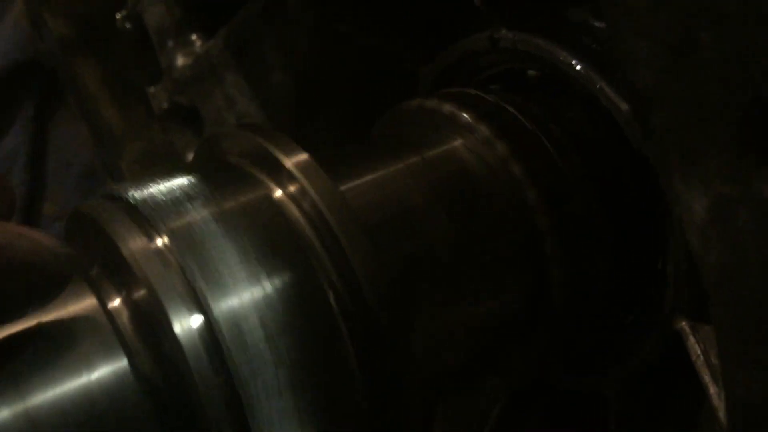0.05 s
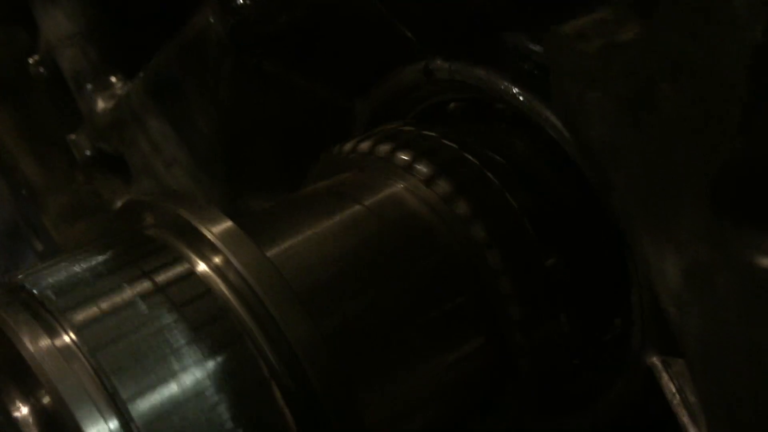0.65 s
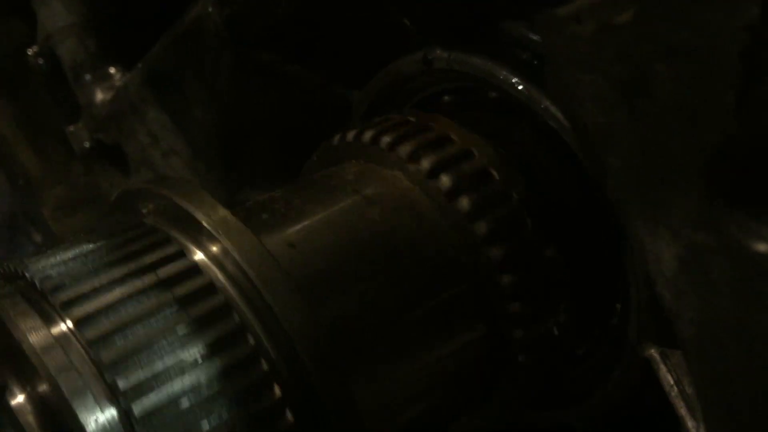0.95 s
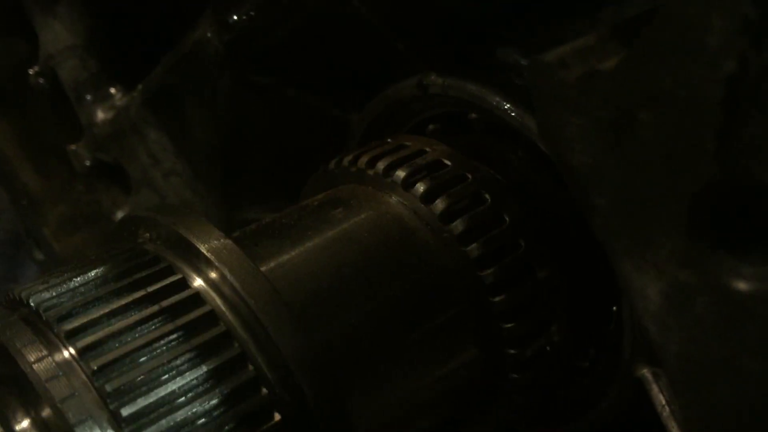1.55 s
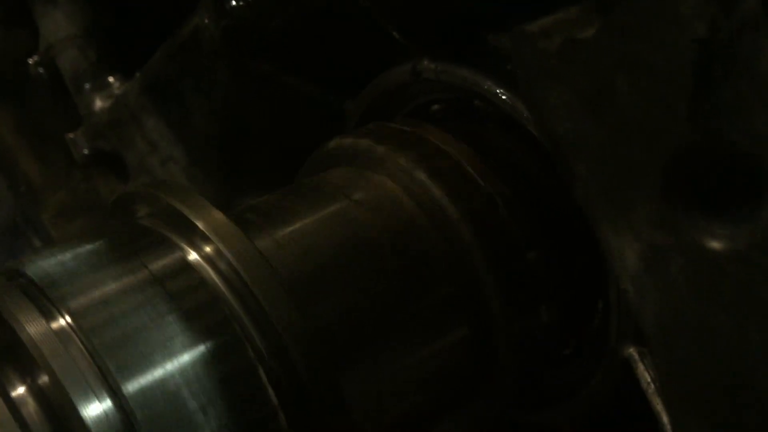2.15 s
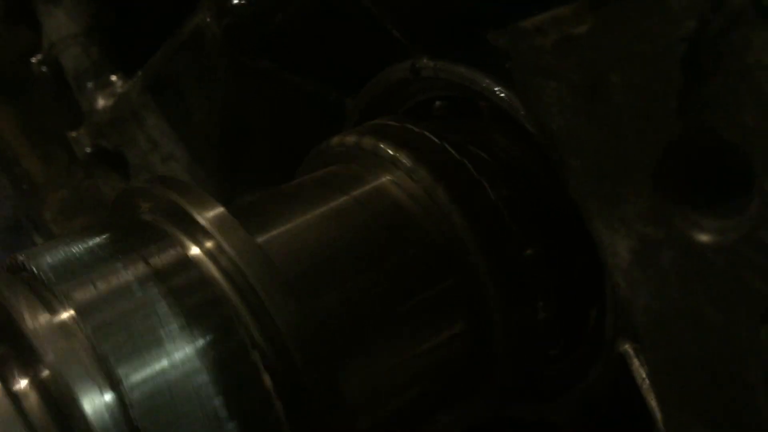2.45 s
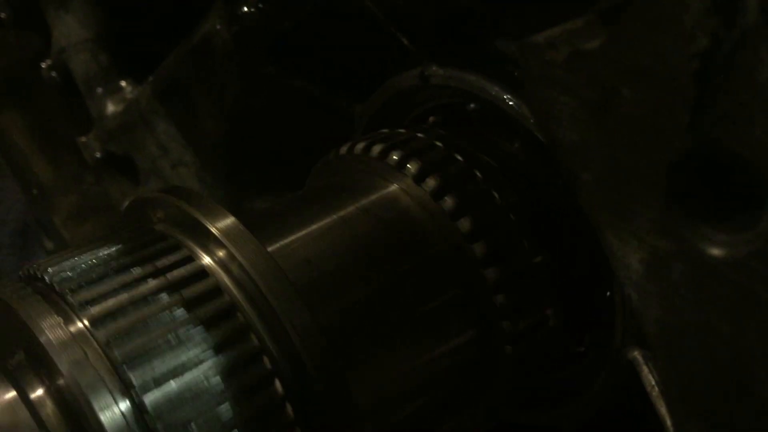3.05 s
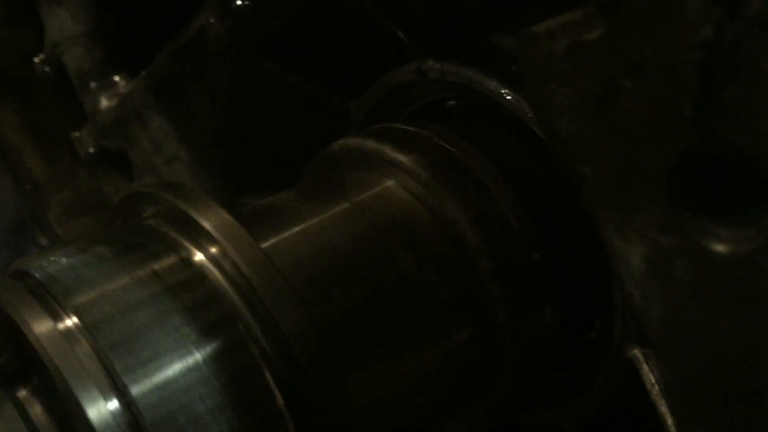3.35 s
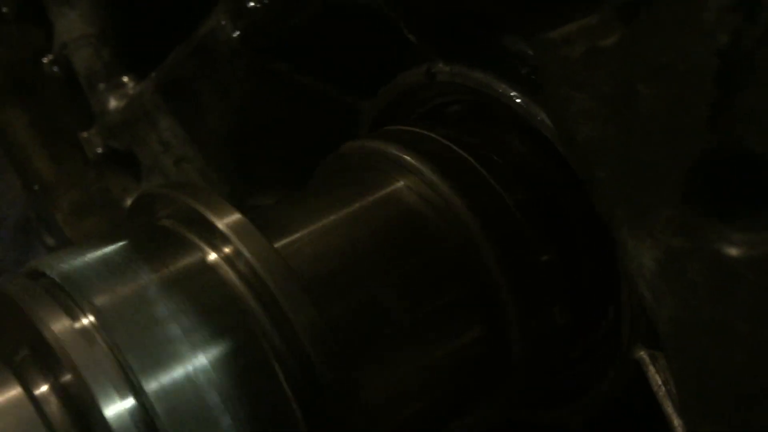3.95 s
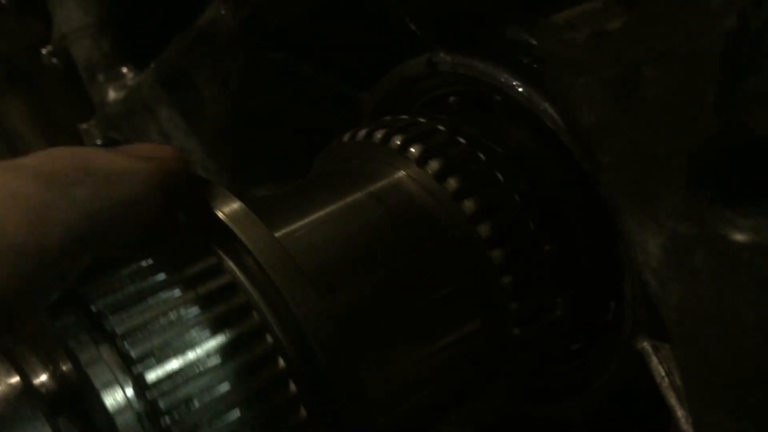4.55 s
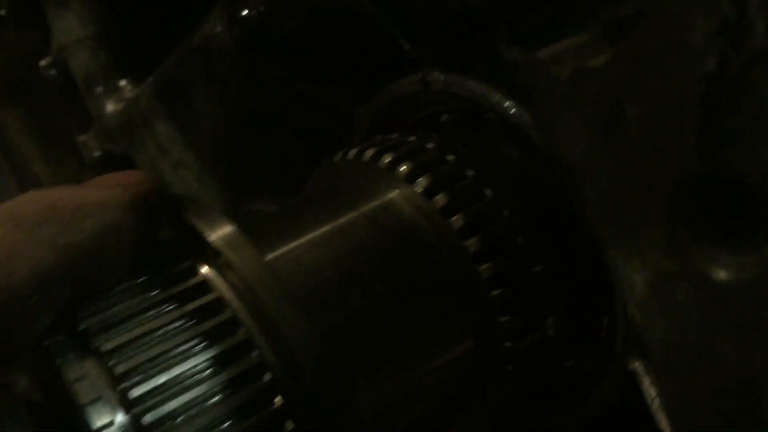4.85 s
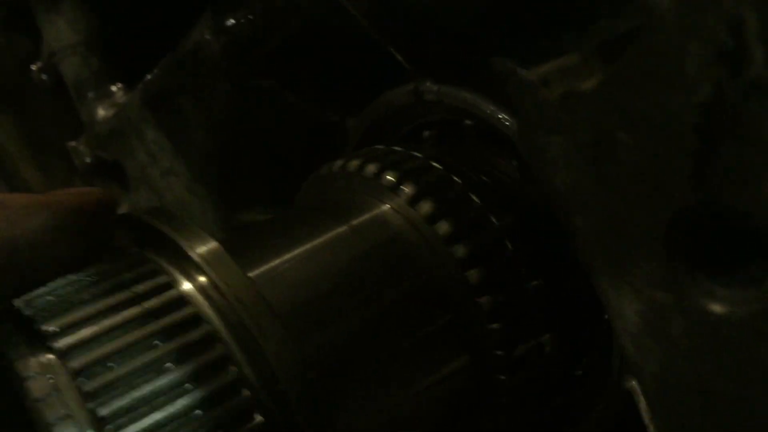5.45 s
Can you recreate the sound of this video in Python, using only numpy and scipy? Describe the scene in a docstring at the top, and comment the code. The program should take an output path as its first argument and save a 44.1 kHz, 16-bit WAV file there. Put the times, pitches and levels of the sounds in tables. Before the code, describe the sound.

A worn bearing rumbles, scrapes and crackles in fits and starts as a hand turns its loose, knocking metal shaft.

```python
"""A steel shaft coasts in a worn roller bearing, over soft workshop noise and a faint electrical whine.
Rollers bump over pits and ring the housing, grit scrapes and cracks on the races, and the loose shaft
rumbles and knocks. After a second it stops and loose rollers clink against their cage. A hand pushes it
round in short spells, throws it into a spin near 3.8 s, brakes it with a hiss of the palm, then rocks it.
Each impact excites the damped resonances of the part it strikes."""
import sys
import numpy as np
from scipy import signal
from scipy.fft import rfft, irfft
from scipy.io import wavfile

SR = 44100
rng = np.random.default_rng(int(sys.argv[2]) if len(sys.argv) > 2 else 0)


def to_wav(sig):
    """Store sig (one row per channel, or 1-D mono) as 16-bit WAV at the path in sys.argv[1].

    Samples outside -1..1 are clipped; the rate is SR.
    """
    pcm = np.clip(np.atleast_2d(sig), -1, 1) * 32767
    pcm = np.round(pcm).astype(np.int16)
    wavfile.write(sys.argv[1], SR, pcm.T)  # frames by channels


N = 251370

# resonances of the bearing's parts: (frequency [Hz], bandwidth [Hz], level [dB])
HOLLOW_MODES = [(316.5, 14.3, -7), (390.5, 25, 1), (401, 22, -10), (412, 28, -10.5), (429.2, 36, -1)]  # hollow of the cast housing
WALL_MODES = [(575.7, 27, 5.5), (634, 7.9, 5.5), (661, 27, -1), (692, 35, -2.5), (826, 12, 4),
              (863, 106, -3), (948, 30, -5.5), (1057, 9.7, -13), (1197, 100, -9.5), (1362, 65, -5.5),
              (1609, 36, -11), (1880, 25, -12), (1980, 68, -15.5)]  # walls of the housing
RACE_MODES = [(1275, 264, 4.5), (1568, 50, 9.5), (2002, 137, 3.5), (2375, 107, 0), (2665, 38, 6),
              (2896, 57, 0.5), (3194, 146, 1), (3262, 204, 0.5), (3546, 99, -1.5), (4100, 140, -1),
              (4160, 93, -2.5), (4400, 60, -26), (4900, 71, -8.5)]  # races and roller cage
ROLLER_MODES = [(5390, 980, -1), (6240, 86, -0.5), (6430, 240, -4.5), (6854, 28, 9), (7060, 220, 3),
                (7850, 310, -5), (8500, 106, 6), (8880, 270, -0.5), (9580, 430, -5.5), (10980, 370, -12),
                (11690, 430, -1.5), (11860, 120, -8.5), (12600, 560, -13), (13600, 530, -7),
                (13400, 200, -14), (15500, 480, -10.5)]


def amp(db):
    """Amplitude ratio of a level: a factor of ten per 20 dB."""
    return 10 ** (np.asarray(db) / 20)


def unit_rms(x):
    """Normalisation to a mean power of 1."""
    return x / np.sqrt(np.mean(x ** 2) + 1e-20)


def add(mix, start_s, sound):
    """Superposition: a sound adds to the mix from its starting time."""
    part = mix[max(round(start_s * SR), 0):][:len(sound)]
    part += sound[:len(part)]


def wander(cutoff_hz):
    """Low-passed Gaussian noise: a slow random fluctuation of rms 1."""
    f = np.fft.rfftfreq(N, 1 / SR)
    return unit_rms(irfft(rfft(rng.standard_normal(N)) / (1 + (f / cutoff_hz) ** 4), N))


def ring(modes, skirt=1.36, size=16384):
    """Impulse response of damped resonances, peak 1; skirt steepens the roll-off outside their range."""
    f = np.fft.rfftfreq(size, 1 / SR) + 1
    power = sum(amp(db) ** 2 / (1 + (2 * (f - hz) / width) ** 2) for hz, width, db in modes)
    low_hz, high_hz = modes[0][0], modes[-1][0] * np.sqrt(2)
    power /= ((1 + (low_hz / f) ** 4) * (1 + (f / high_hz) ** 4)) ** skirt
    # folding the cepstrum gives a causal, minimum-phase response
    cepstrum = irfft(np.log(power / power.max() + 1e-10) / 2)
    cepstrum[1:size // 2] *= 2
    cepstrum[size // 2 + 1:] = 0
    response = irfft(np.exp(rfft(cepstrum)))[:size // 2]
    return response / abs(response).max()


def impacts(per_s, spread_db):
    """Shot noise: independent tiny blows of random sign and size, rms 1."""
    size = amp(spread_db * np.minimum(rng.exponential(1, N), 4)) * rng.choice([-1, 1], N)
    struck = rng.random(N) < per_s / SR
    return unit_rms(size * struck / np.sqrt(per_s))


def excite(force, response):
    """Forced vibration: the force is convolved with an impulse response of unit energy."""
    return signal.oaconvolve(force, response / np.linalg.norm(response))[:N]


def casing(direct, wet, t60=0.051, count=40):
    """Early reflections from the surrounding metal follow the direct sound, decaying exponentially."""
    delay_s = rng.uniform(.001, .03, count)
    taps = np.zeros(SR // 20)
    taps[(delay_s * SR).astype(int)] = rng.choice([-1, 1], count) * amp(-60 * delay_s / t60)
    taps *= wet / np.linalg.norm(taps)
    taps[0] = 1
    return excite(direct, taps)


def rolling(force, modes, skirt, uneven_db, detune, wet, count=6):
    """Moving excitation: the contact wanders among places, each with its own modal mix and reflections."""
    hz, width, db = np.transpose(modes)
    shares = amp(13.6 * np.array([wander(22) for _ in range(count)]))
    shares /= np.linalg.norm(shares, axis=0)
    chance = rng.standard_normal((2, count, len(hz)))
    shifts, heights = chance - chance.mean(1, keepdims=True)
    out = np.zeros(N)
    for share, shift, height in zip(shares, shifts, heights):
        local_modes = np.c_[hz * (1 + detune * shift), width, db + uneven_db * height]
        out += excite(force * share, casing(ring(local_modes, skirt), wet))
    return out


def swell(age, half_s):
    """Envelope of a transient load, falling to half at half_s either side of its peak."""
    return .5 ** ((abs(age) / half_s) ** 1.2)


def push(age, length, rise_s, fall_db_per_s):
    """Envelope of a driven motion: it builds, holds while the hand turns, then decays exponentially."""
    return np.clip(age / rise_s, 0, 1) ** 1.311 * amp(-fall_db_per_s * np.maximum(age - length, 0))


def drive():
    """Incoherent addition: the powers of spin, pushes, scrapes and lurches sum to each part's drive in dB."""
    # shaft rotation: (time [s], speed [share of top speed])
    coast = [(0, 0.18), (.5, .1), (.78, .055), (1.035, 0.026), (1.066, 0)]  # friction brings it to rest
    throw = [(3.746, 0.083), (3.82, 0.55), (3.92, 1.0), (4.014, .58), (4.2, .39), (4.43, 0.21),
             (4.45, 0.056)]  # one hard throw, braked by the palm
    # drive grows with speed and levels off past a knee; rows are bench, hollow, walls, races, rollers:
    # (level at top speed [dB], knee [share of top speed])
    spin_law = [(-53.5, 0.2), (-35.5, 1), (-32, 24.2), (-47.5, 0.23), (-55.5, .115)]
    # pushes of the hand: (start [s], length [s], bench [dB], housing [dB], races [dB], rollers [dB])
    pushes = [(1.409, 0.16, -54.5, -60.5, -62.0, -62.5), (2.015, 0.16, -57.5, -57.5, -60.5, -63),
              (2.217, 0.22, -42.5, -42.5, -50.5, -53), (2.525, 0.14, -40.5, -44.5, -50, -53),
              (2.654, 0.095, -50, -45.5, -54, -56), (2.809, 0.15, -45, -50, -54.0, -57),
              (2.966, 0.15, -47, -49.5, -55.0, -58), (3.195, 0.14, -45.5, -48.5, -53.0, -56.5),
              (3.358, 0.14, -46, -45.5, -54.5, -59), (3.605, 0.077, -43, -51, -53.0, -55),
              (3.696, 0.28, -40, -47.0, -52.5, -58.5), (4.26, 0.19, -49, -48.5, -62, -57.0),
              (4.518, 0.089, -45, -52.5, -52.5, -53.5), (4.662, 0.047, -61.5, -72, -72.5, -71),
              (4.741, 0.105, -55, -59, -59.0, -61), (4.905, 0.043, -46, -52, -56, -59),
              (5.093, 0.066, -57, -62, -59, -63), (5.195, 0.04, -65, -54.0, -67, -67),
              (5.273, 0.12, -46.5, -43, -53, -55), (5.441, 0.058, -42.0, -44.5, -46.5, -50.5),
              (5.536, 0.047, -54, -58, -53, -57.5), (5.601, 0.064, -57.5, -58, -49.5, -54)]
    # a roller drags through grit: (peak time [s], half-length [s], races [dB])
    scrapes = [(1.098, 0.018, -60.5), (1.225, 0.01096, -56.5), (1.449, 0.0287, -55.5), (2.047, 0.02, -50.5),
               (2.171, 0.012, -52.0), (2.25, 0.01, -45), (2.616, 0.011, -48), (2.935, 0.0076, -48),
               (3.104, 0.009, -54), (3.298, 0.024, -45.5), (4.784, 0.0062, -44), (4.944, 0.012, -51.0),
               (5.124, 0.0073, -45.0), (5.234, 0.019, -48.5), (5.499, 0.02, -48.5), (5.587, 0.0055, -45.5),
               (5.672, 0.012, -52)]
    # the shaft lurches over a deep pit: (peak time [s], bench [dB], hollow [dB])
    lurches = [(-0.002, -43, -37.5), (0.194, -57, -47), (0.287, -76, -37.0), (0.503, -49.5, -44.5),
               (0.659, -50.5, -66), (1.017, -60.5, -51.5), (2.124, -51, -47), (2.325, -51.0, -31.5),
               (2.396, -41.5, -37), (2.718, -58, -36.5), (2.995, -48, -39), (3.321, -35.5, -42),
               (3.418, -58, -37.5), (3.821, -37.5, -31), (5.37, -58, -35.5)]
    t = np.arange(0, N / SR, .001)
    speed = np.interp(t, *np.transpose(coast), right=0)
    speed += np.interp(t, *np.transpose(throw), left=0, right=0)
    floor_power = amp(-88.5) ** 2  # faint floor that keeps each level finite in the pauses
    bench, hollow, walls, races, rollers = (
        floor_power + (amp(db) * speed * (1 + knee) / (speed + knee)) ** 2 for db, knee in spin_law)
    for start, length, bench_db, housing_db, races_db, rollers_db in pushes:
        # the grit answers first, the heavy parts later
        grit = push(t - start, length, rise_s=0.027, fall_db_per_s=327)
        grind = push(t - start, length, rise_s=0.032, fall_db_per_s=472)
        rumble = push(t - start, length, rise_s=0.044, fall_db_per_s=353)
        bench += (amp(bench_db) * rumble) ** 2
        hollow += (amp(housing_db) * grind) ** 2
        walls += (amp(housing_db) * grind) ** 2
        races += (amp(races_db) * grit) ** 2
        rollers += (amp(rollers_db) * grit) ** 2
    for peak_s, half_s, db in scrapes:
        scrape = amp(db) * swell(t - peak_s, half_s)
        races += scrape ** 2
        walls += (amp(-3) * scrape) ** 2
        rollers += (amp(-3) * scrape) ** 2
    for peak_s, bench_db, hollow_db in lurches:
        lurch = swell(t - peak_s, half_s=.02)
        bench += (amp(bench_db) * lurch) ** 2
        hollow += (amp(hollow_db) * lurch) ** 2
    powers = bench, hollow, walls, races, rollers
    return [np.interp(np.arange(N) / SR, t, 10 * np.log10(power)) for power in powers]


def bearing():
    """Roughness excitation: rollers strike pits and grit, harder and more often as the drive rises."""
    # low resonances of shaft and bench: (frequency [Hz], bandwidth [Hz], level [dB])
    bench_modes = [(78, 27, -1), (101, 63, -4), (123, 8.6, 0.5), (165, 28, -21.5), (180, 37, -5.5),
                   (203, 11, 0.5), (203, 140, -4)]
    bench_db, hollow_db, walls_db, race_db, rollers_db = drive()
    speed = amp(.3 * (walls_db - walls_db.max()))
    # the load swells each time a roller crosses the worn patch
    pass_hz = 160 * speed * (1 + 0.0509 * wander(17.3))
    pass_phase = 2 * np.pi * np.cumsum(pass_hz) / SR
    load = unit_rms(amp(2 * np.cos(pass_phase) + 0.82 * wander(83)))
    # long bumps shake the heavy parts, fine grit the small hard ones
    bumps = impacts(2000 * speed, spread_db=0.4) * load
    pits = impacts(3000 * speed, spread_db=0.5) * load
    grit = impacts(5000 * speed, spread_db=1.0) * load
    dust = grit + 0.38 * impacts(5000 * speed, spread_db=-1.0) * load
    dust = unit_rms(dust * amp(0.5 * wander(42)))  # the finest dust lies in clumps
    rumble = excite(bumps * amp(bench_db - 1.1), ring(bench_modes, skirt=0.95))
    roll = excite(pits * amp(hollow_db - 2.3), ring(HOLLOW_MODES, skirt=1.0))
    grind = rolling(pits * amp(walls_db - 4), WALL_MODES, skirt=1.5, uneven_db=4.5, detune=0.001, wet=0.6)
    scrape = rolling(grit * amp(race_db - 3), RACE_MODES, skirt=0.88, uneven_db=2.5, detune=0.0041, wet=1)
    fizz = rolling(dust * amp(rollers_db - 3.5), ROLLER_MODES,
                   skirt=0.95, uneven_db=6, detune=0.0033, wet=0.68)
    return rumble + roll + grind + scrape + fizz


def workshop():
    """Broadband room noise and an electrical whine, modulated in amplitude and phase by the mains."""
    # spectrum of the room noise: (frequency [Hz], relative spectral level [dB])
    room_spectrum = [(20, -12), (42, -3), (70, 2.5), (100, 9), (145, -10), (185, -4), (290, -3),
                     (450, -10.5), (900, -12.5), (2200, -16.5), (2850, -8), (3600, -20.5), (6400, -20),
                     (10000, -25), (15500, -26)]
    whine_hz, mains_hz = 13623, 60
    f, t = np.fft.rfftfreq(N, 1 / SR), np.arange(N) / SR
    hz, db = np.transpose(room_spectrum)
    colour = amp(np.interp(np.log(f + 1), np.log(hz), db))
    air = irfft(rfft(rng.standard_normal(N)) * colour, N)
    mains_phase = 2 * np.pi * mains_hz * t
    whine_phase = 2 * np.pi * whine_hz * t + .3 * np.sin(mains_phase) + 0.62 * wander(8.8)
    whine = amp(12 * np.cos(mains_phase)) * np.sin(whine_phase)
    return amp(-67) * unit_rms(air) + amp(-77.5) * unit_rms(whine)


def blow(response, decay_s, grain, size=2048):
    """Impact excitation: an impulse and a brief noisy crumble, weighted by grain, ring a body; peak 1."""
    age = np.arange(size) / SR / decay_s
    crumble = rng.standard_normal(size) * np.sqrt(age) * np.exp(-age)
    force = grain * crumble / np.linalg.norm(crumble)
    force[0] += 1
    sound = signal.fftconvolve(force, response)
    return sound / abs(sound).max()


def knocks():
    """Impact across a clearance: the shaft takes up its play, steel clacks, housing and bench follow."""
    # knocks of the shaft: (time [s], housing [dB], thud [dB], clack [dB])
    strikes = [(0.068, -33, -65, -60), (0.27, -35.5, -52, -59), (0.85, -42.5, -50, -63),
               (1.54, -45, -44, -48), (2.377, -27, -34, -39), (2.986, -28.5, -35.5, -44),
               (4.029, -28, -46.5, -55.5), (4.313, -25.5, -56, -39), (4.357, -28.5, -57, -60),
               (4.399, -30.5, -54, -40), (4.814, -44, -36.5, -47), (4.908, -48, -40, -51),
               (5.3003, -24, -22, -19.5), (5.485, -23.5, -26, -32)]
    # resonances of the low thud and the steel's clack: (frequency [Hz], bandwidth [Hz], level [dB])
    thud_modes = [(107, 26, -2), (192, 27, 9), (300, 11, 6.5)]
    clack_modes = [(814, 46, -22), (1314, 79, 7), (1440, 64, -12.5), (1630, 97, 2), (2010, 17, 4.5),
                   (3380, 214, -8)]
    out = np.zeros(N)
    housing = ring(HOLLOW_MODES) + ring(WALL_MODES)
    thud, clack = ring(thud_modes, skirt=0.31), ring(clack_modes, skirt=6.2)
    for time_s, housing_db, thud_db, clack_db in strikes:
        add(out, time_s, amp(clack_db) * blow(clack, decay_s=0.002, grain=0.9))
        add(out, time_s + 0.00078, amp(housing_db) * blow(housing, decay_s=0.0039, grain=1.0))
        add(out, time_s + 0.0014, amp(thud_db) * thud)
    return out


def cracks():
    """Brittle fracture: a grain breaks under a roller and sets race and roller ringing."""
    # breaking grains: (time [s], races [dB], rollers [dB])
    fractures = [(0.407, -40.5, -44.5), (0.508, -37.5, -46), (0.649, -53, -45.5), (0.829, -44.5, -54),
                 (2.16, -49, -43), (2.226, -34, -38.5), (2.2429, -33, -39), (2.3072, -30.5, -36),
                 (2.325, -40, -34), (2.3866, -37, -36), (2.63, -31.5, -50), (2.815, -50, -41),
                 (2.9217, -37, -38), (3.206, -53, -45), (3.283, -35.5, -37), (3.4884, -42, -40.5),
                 (3.618, -59, -57.5), (3.712, -39, -38), (3.749, -32.5, -37.5), (3.927, -47, -35),
                 (4.286, -36.5, -40.5), (4.548, -55, -51), (4.784, -28.5, -42), (4.9346, -55, -40),
                 (5.121, -50, -41), (5.229, -33, -35.5)]
    out, race, roller = np.zeros(N), ring(RACE_MODES), ring(ROLLER_MODES)
    for time_s, race_db, roller_db in fractures:
        add(out, time_s, amp(race_db) * casing(blow(race, decay_s=0.0014, grain=2.6), wet=1.0))
        add(out, time_s, amp(roller_db) * casing(blow(roller, decay_s=0.002, grain=6.8), wet=0.64))
    return out


def clinks():
    """Free vibration: as the shaft stops, unloaded rollers drop against their cage and ring."""
    # falling rollers: (time [s], level [dB])
    drops = [(1.0175, -41), (1.084, -50), (1.2195, -43)]
    # resonances of roller and cage: (frequency [Hz], bandwidth [Hz], level [dB])
    cage_modes = [(1320, 110, 3), (2020, 100, -3), (3350, 120, 0.5), (3640, 120, -13), (4060, 78, 3),
                  (4850, 120, -6), (8200, 490, -6.5)]
    out = np.zeros(N)
    for time_s, db in drops:
        add(out, time_s, amp(db) * blow(ring(cage_modes), decay_s=0.004, grain=1.3))
    return out


def palm():
    """Sliding friction: skin brakes the smooth shaft with a fine, high hiss."""
    # envelope of the hiss: (time [s], level [dB])
    envelope = [(4.198, -85.5), (4.331, -71.5), (4.411, -55), (4.45, -68), (4.498, -78), (4.57, -68),
                (4.631, -48.5), (4.655, -93)]
    highpass = signal.butter(4, 12500, "high", fs=SR, output="sos")
    hiss = signal.sosfilt(highpass, impacts(9000, spread_db=0))
    level_db = np.interp(np.arange(N) / SR, *np.transpose(envelope), left=-np.inf, right=-np.inf)
    return unit_rms(hiss) * amp(level_db)


def scene():
    """Superposition of bearing, grit, knocks, hand and workshop in one channel."""
    return (bearing() + cracks() + clinks() + knocks() + palm() + workshop())[None]


def record(dry):
    """Band limiting: a linear-phase low-pass filter removes the highest treble."""
    cutoff_hz = 15830
    lowpass = signal.firwin(611, cutoff_hz, window=("kaiser", 9), fs=SR)
    return signal.oaconvolve(dry, lowpass[None], "same")


dry = scene()
out = record(dry)
to_wav(out)
```